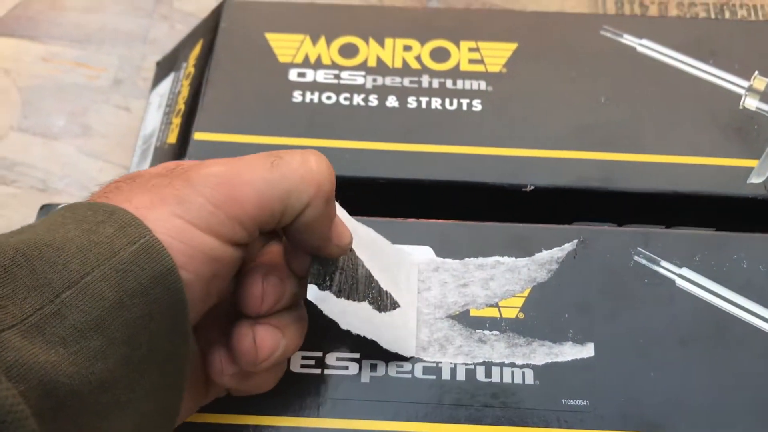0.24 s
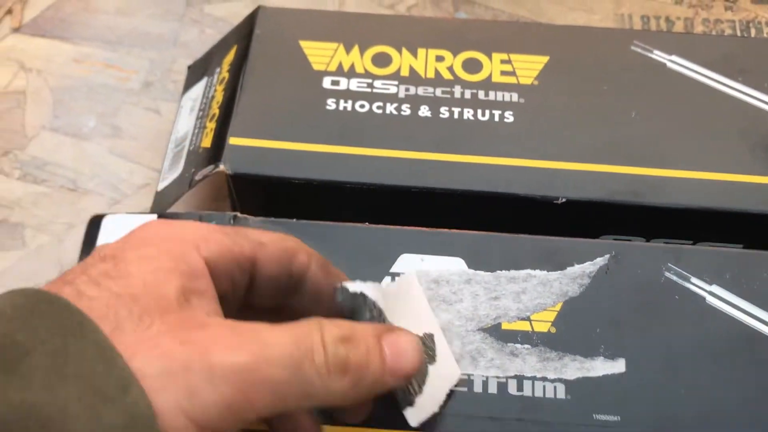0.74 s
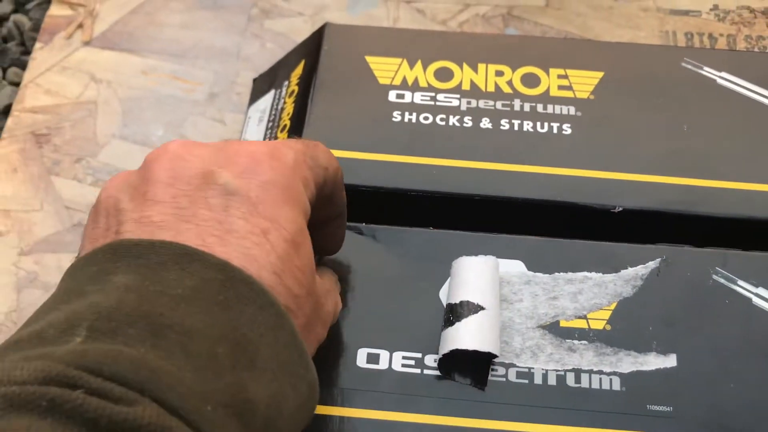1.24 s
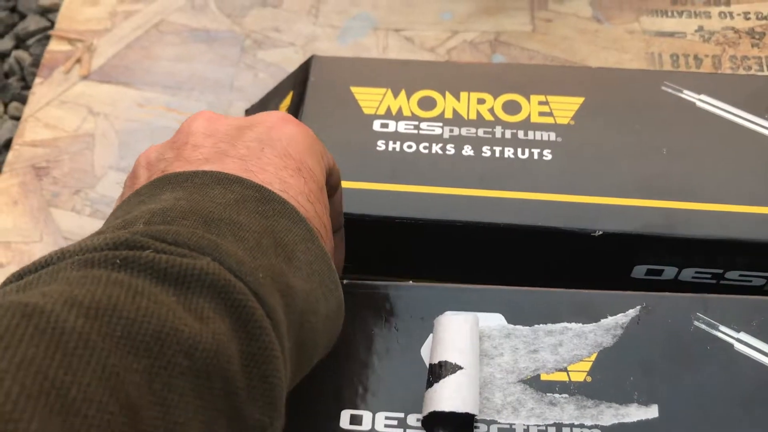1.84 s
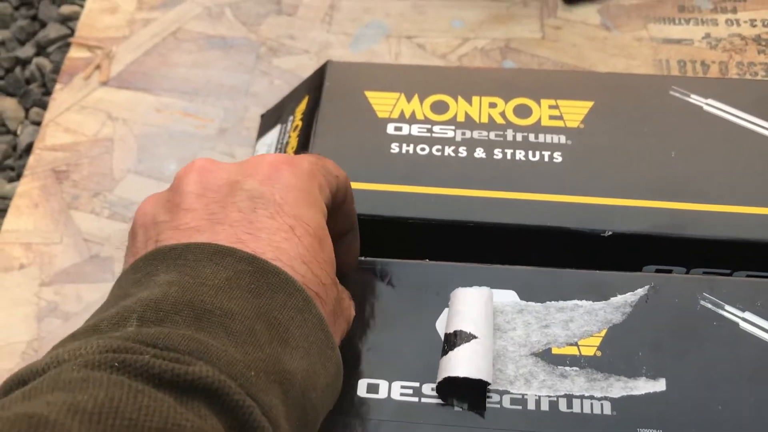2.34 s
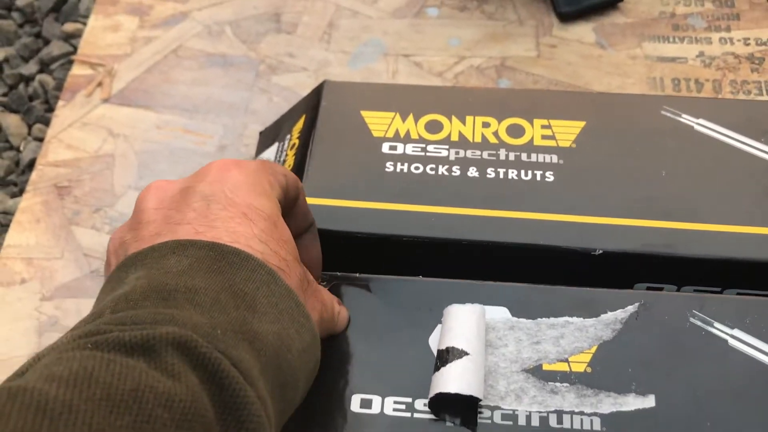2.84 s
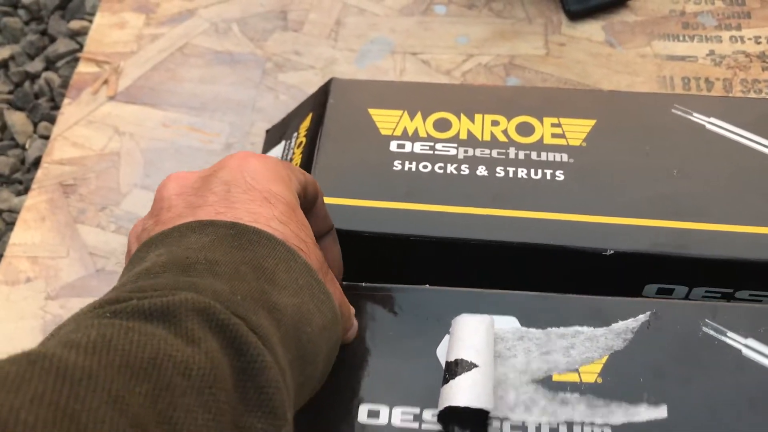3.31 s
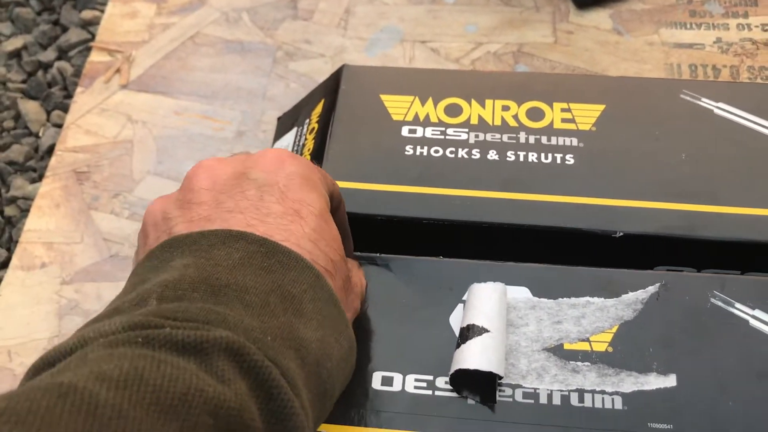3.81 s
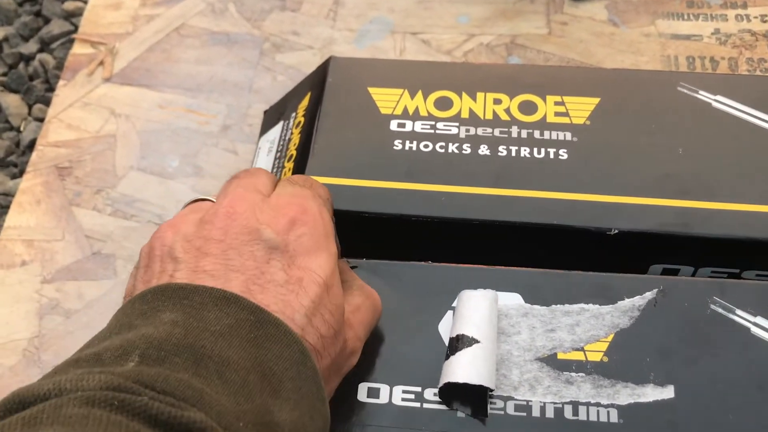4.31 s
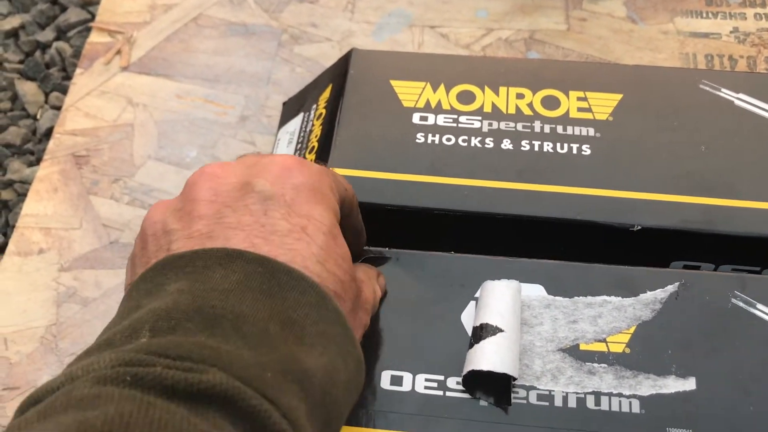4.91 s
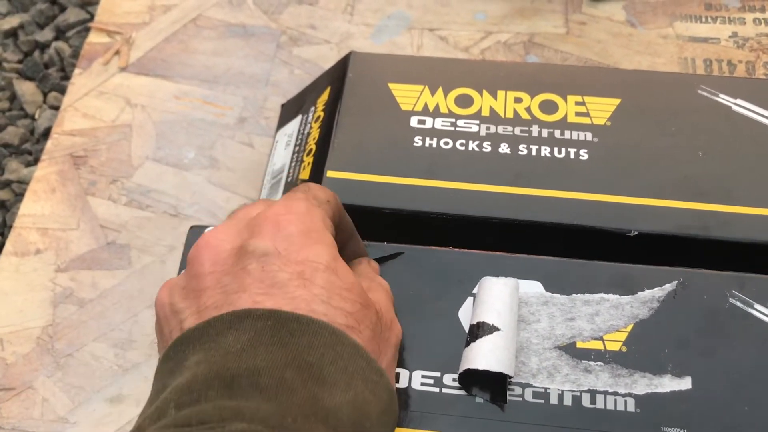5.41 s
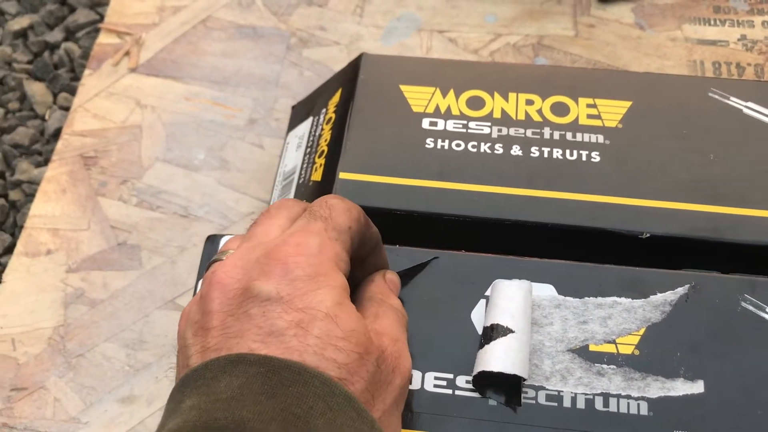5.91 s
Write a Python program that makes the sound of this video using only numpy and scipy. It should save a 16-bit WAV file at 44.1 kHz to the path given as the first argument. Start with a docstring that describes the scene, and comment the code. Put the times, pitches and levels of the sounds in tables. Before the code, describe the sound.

Recorded very close and dry, over faint bassy air and a wavering distant engine drone. From 0 to 0.35 s a paper sticker tears with a crisp, fibrous, swelling rip; another pull follows at 0.38-0.55 s. At 0.64-0.72 s it sticks and slips in a brief low buzzing judder, then sharp clicks and short rips around 0.74-0.98 s, with a soft hollow bump at 0.77. From 1.1 s fingers rub the card quietly, in uneven scrapes with tiny ticks and faint squeaks. The flap pops loudly at 1.89, 2.65 and 3.33 s, each a hard crack with a short boxy boom; the first is brightest. A double tick lands at 2.44. Light rubbing and ticks continue, with very faint tape hiss at 4.05-4.55 and 5.1-5.95 s, a knock at 4.95, two bright snaps at 5.76 and 5.80, then soft rubbing until the end.

```python
"""A hand tears a paper sticker off a long cardboard box, then picks and rubs at the taped flap at its end.
Tearing and rubbing are showers of tiny breaks and slips, filtered by the cardboard; squeaks are sine glides.
The flap pops three times with cracks and decaying box modes; tape peels as shaped noise, with two sharp snaps.
Nails tick on the card as short ringing bursts, the hand bumps the box, and an engine drones far away."""
import sys
import numpy as np
from scipy import signal
from scipy.fft import rfft, irfft, next_fast_len
from scipy.io import wavfile
from scipy.ndimage import uniform_filter1d

SR = 44100
rng = np.random.default_rng(int(sys.argv[2]) if len(sys.argv) > 2 else 0)


def master_out(mix):
    """Clip the mix to full scale and print it as 16-bit PCM to the path in sys.argv[1]."""
    frames = np.transpose(np.atleast_2d(mix))
    ceiling = np.clip(frames, -1, 1)
    pcm = np.round(ceiling * 32767).astype(np.int16)
    wavfile.write(sys.argv[1], SR, pcm)


N = 271215
TIME = np.arange(N) / SR

# Levels in all tables are relative.
# Pulls on the sticker. Each row: start in seconds, length in seconds, panel level in dB, fibre level in dB.
PULLS = [(0.0, 0.35, -41.5, -41.5), (0.106, 0.0037, -44, -42.5), (.202, 0.0042, -45, -47),
         (0.376, 0.11, -38.5, -39), (0.495, 0.054, -50.5, -50), (0.559, 0.011, -43.5, -44),
         (0.57, 0.018, -46.5, -47.5), (0.649, 0.072, -52.5, -63), (0.734, .006, -44.5, -40),
         (0.74, 0.019, -39.5, -49), (0.765, 0.0063, -36.5, -32), (0.782, 0.0079, -44, -46),
         (.838, .025, -60, -63), (0.86, 0.01, -51.5, -47.5), (.926, 0.011, -44, -47),
         (0.938, 0.029, -45.5, -72)]
# Spectrum of tearing fibres. Each row: frequency in Hz, density in dB per Hz.
FIBRES = [(900, -8), (1500, -14), (2150, -7.5), (2650, -4), (3500, -4.5), (4800, -6), (5670, 0.5),
          (6600, -3.5), (7500, -6), (9700, -5.5), (10400, -7), (11300, 0), (16000, -8.5)]
PULL_ATTACK_S, PULL_SWELL_DB, PULL_RELEASE_DB_PER_S = 0.0013, 8, 500
TUG_LOW_HZ = 430  # light tugs hardly move the panel below this


def sticker():
    """Paper fibres break by the thousand, whole bundles more rarely; their tugs shake the panel beneath."""
    tug, rip = 0, 0
    for start_s, length_s, panel_db, fibre_db in PULLS:
        gain = pull(start_s, length_s, PULL_ATTACK_S, PULL_SWELL_DB, PULL_RELEASE_DB_PER_S)
        tug = np.maximum(tug, from_db(panel_db) * gain)
        rip = np.maximum(rip, from_db(fibre_db) * gain)
    bundles = grains(per_s=280, spread_db=2.0, clump_db=2.4, clump_rate_hz=54)
    fibres = grains(per_s=7600, spread_db=2.5, clump_db=-0.5, clump_rate_hz=210)
    breaks = rms_one(fibres) + from_db(-8.5) * rms_one(bundles)
    high_pass = signal.butter(1, TUG_LOW_HZ, "high", fs=SR, output="sos")
    body = from_db(1.5) * tug * rms_one(panel(signal.sosfilt(high_pass, breaks)))
    tearing = shifting(colour(breaks, FIBRES), depth_db=2.5, rate_hz=69)
    return body + from_db(-4.5) * rip * tearing


# Sticker judders. Each row: start in seconds, length in seconds, slips per second, tone level in dB,
# fibre level in dB.
JUDDERS = [(0.641, 0.01, 720, -36, -63), (0.656, 0.009, 610, -32.5, -50.5),
           (0.667, 0.0077, 740, -33.5, -55), (0.671, 0.02, 600, -27, -56), (0.71, 0.0083, 540, -56, -50.5)]


def judder():
    """Stick and slip sing for a few uneven cycles; each slip rips some fibres."""
    out, wobble, shake = np.zeros(N), drift(150), drift(310)
    fibres = colour(rng.standard_normal(N), FIBRES)
    for start_s, length_s, slips_hz, tone_db, fibre_db in JUDDERS:
        on = (TIME >= start_s) & (TIME < start_s + length_s)
        t = TIME[on] - start_s
        hz = slips_hz * (1 + 0.036 * wobble[on])
        slip = np.sin(2 * np.pi * np.cumsum(hz) / SR)
        tone = from_db(tone_db + 2.2 * shake[on]) * slip
        ripping = from_db(fibre_db) * (1 + slip) * fibres[on]
        envelope = np.sqrt(np.abs(np.sin(np.pi * t / length_s)))
        out[on] += envelope * (tone + ripping)
    return out


# Finger strokes over the flap. Each row: middle in seconds, length in seconds, panel level in dB, grit level in dB.
RUBS = [(1.146, 0.07, -56, -60), (1.191, 0.057, -61.5, -58), (1.244, 0.031, -55, -60),
        (1.319, 0.054, -56, -67), (1.367, 0.042, -57.5, -56), (1.532, .08, -51.5, -58.5),
        (1.576, 0.022, -52, -44.5), (1.638, 0.074, -53, -78), (1.75, 0.18, -60.5, -74),
        (1.877, 0.092, -58.5, -54.5), (1.947, 0.018, -76, -51), (2.024, 0.052, -52, -64),
        (2.118, 0.1, -57.5, -60), (2.265, 0.023, -61.5, -72), (2.363, 0.04, -55, -62),
        (2.445, 0.034, -49.5, -50), (2.513, 0.094, -56.5, -55), (2.65, 0.091, -57, -60),
        (2.706, 0.013, -67, -45.5), (2.768, 0.065, -46.5, -61), (2.845, 0.12, -57, -57.5),
        (2.957, .02, -59, -54), (3.0, 0.047, -56.5, -54), (3.153, 0.12, -58, -72), (3.295, 0.052, -67, -45),
        (3.47, 0.068, -55.5, -54.5), (3.547, .07, -57, -65), (3.654, 0.058, -55.5, -58),
        (3.732, 0.046, -62.5, -58.5), (3.823, 0.032, -71, -56), (3.955, 0.17, -64.5, -73),
        (4.108, .06, -66.5, -62), (4.213, 0.081, -55, -65), (4.378, 0.057, -63, -56),
        (4.705, 0.07, -58, -75), (4.772, .045, -52.5, -61), (4.943, 0.087, -52, -59),
        (5.088, 0.085, -55.5, -73), (5.208, 0.13, -55, -53), (5.733, 0.072, -74, -49.5),
        (5.85, 0.094, -52.5, -52), (6.07, 0.066, -54.5, -58), (6.152, 0.15, -49, -72)]
# Spectrum of the grit. Each row: frequency in Hz, density in dB per Hz.
GRIT = [(1100, 2), (1750, -4.5), (2200, -11.5), (2650, -1.5), (3050, -2), (3600, 5.5), (4900, -17.5),
        (5800, -5), (7500, -21.5), (9300, -12.5), (10400, -15), (12000, -6.5), (16000, -10.5)]
RESTING_DB = (-68, -74)  # panel, grit: the hand rests lightly between strokes


def fingers():
    """Skin and nails drag over the card in small uneven slips, now and then catching on an edge."""
    drag, grit = from_db(RESTING_DB)
    for middle_s, length_s, panel_db, grit_db in RUBS:
        gain = arch(middle_s, length_s)
        drag = np.maximum(drag, from_db(panel_db) * gain)
        grit = np.maximum(grit, from_db(grit_db) * gain)
    catches = grains(per_s=77, spread_db=1.5, clump_db=3.0, clump_rate_hz=2.9)
    small_slips = grains(per_s=6000, spread_db=0.0, clump_db=4.0, clump_rate_hz=40)
    slips = rms_one(small_slips) + from_db(-7) * rms_one(catches)
    body = from_db(-0.27) * drag * rms_one(panel(slips))
    scraping = shifting(colour(slips, GRIT), depth_db=5.0, rate_hz=9.8)
    return body + from_db(-5.5) * grit * scraping


# Faint squeaks. Each row: start in seconds, length in seconds, start pitch in Hz, end pitch in Hz, # level in
# dB.
SQUEAKS = [(1.944, 0.016, 8000, 5500, -61), (2.788, 0.032, 9500, 13500, -66), (2.98, 0.02, 4800, 3400, -59),
           (3.27, 0.025, 5150, 4000, -59), (3.549, 0.018, 6300, 3500, -58), (3.735, 0.028, 3270, 8340, -63),
           (4.726, 0.023, 7700, 11900, -66)]


def squeaks():
    """Thin, unsteady tones glide briefly in pitch."""
    out, wobble = np.zeros(N), drift(360)
    for start_s, length_s, start_hz, end_hz, db in SQUEAKS:
        on = (TIME >= start_s) & (TIME < start_s + length_s)
        along = (TIME[on] - start_s) / length_s
        hz = (start_hz + (end_hz - start_hz) * along) * (1 + 0.087 * wobble[on])
        out[on] += from_db(db) * np.sin(np.pi * along) * np.sin(2 * np.pi * np.cumsum(hz) / SR)
    return out


# The flap pops. Each row: time in seconds, ring pitch in Hz, then levels in dB of panel, crack, snap, edge,
# and the box's first, second, third and higher air modes.
POPS = [(1.893, 4070, -19, -28, -26, -39, -41.5, -30.5, -30.5, -28.5),
        (2.6469, 2740, -23.5, -34.5, -38, -32.5, -39.5, -29, -33, -33.5),
        (3.332, 2740, -23, -30, -37, -25.5, -39, -34, -26.5, -29)]
# Modes of the end flap. Each row: frequency in Hz, width in Hz, level in dB.
FLAP = [(765, 51, 6), (1040, 78, 1.5), (1303, 150, -5.5)]


def flap():
    """The flap gives way with a crack, rings briefly and pumps the air in the box."""
    out = np.zeros(N)
    clack = peak_one(resonate(signal.unit_impulse(SR // 10), FLAP), size=176)
    for s, ring_hz, panel_db, *levels_db in POPS:
        bands_db, modes_db = [panel_db - 4.0] + levels_db[:3], levels_db[3:]
        release = crack(bands_db, ring_hz, ragged_db=-1.5, ring_db=9.0, ring_t60_s=0.02)
        add(out, s + 0.000937, from_db(-1.84) * release)
        add(out, s + .003, from_db(panel_db - 3.5) * clack)
        add(out, s, from_db(6.5) * boom(modes_db, scatter_db=3.5))
    return out


# Peeling tape. Each row: start in seconds, length in seconds, hiss level in dB.
PEELS = [(4.047, 0.054, -67.5), (4.124, 0.44, -65.5), (5.12, 0.063, -66), (5.235, .22, -67),
         (5.462, 0.49, -62.5)]
# Spectrum of the glue threads. Each row: frequency in Hz, density in dB per Hz.
TAPE = [(1100, -3), (1700, -2.5), (2500, -5), (3400, -1.5), (4400, -1), (5200, -5), (6100, -3),
        (7700, -5.5), (9300, -3), (10500, -9), (11800, -2.5), (14000, 0), (16000, -6)]
# Modes of the taut tape. Each row: frequency in Hz, width in Hz, level in dB.
TAUT = [(1600, 310, 5.5), (3400, 160, 2.5), (4350, 320, -3.5), (5600, 220, -9)]
PEEL_ATTACK_S, PEEL_SWELL_DB, PEEL_RELEASE_DB_PER_S = 0.01, 7.5, 138


def tape():
    """Glue threads part so densely that they merge into a fine, bright hiss, coloured by the taut tape."""
    gain = 0
    for start_s, length_s, db in PEELS:
        gain = gain + from_db(db) * pull(start_s, length_s, PEEL_ATTACK_S, PEEL_SWELL_DB, PEEL_RELEASE_DB_PER_S)
    threads = colour(rng.standard_normal(N) * from_db(2.4 * drift(170)), TAPE)
    return from_db(5.5) * gain * rms_one(threads + resonate(threads, TAUT))


# The tape snaps free. Each row: time in seconds, ring pitch in Hz, panel knock in dB, snap level in dB.
SNAPS = [(5.757, 6560, -43, -27.5), (5.8, 1680, -35, -24.5)]
SNAP_UNDER_DB, SNAP_OVER_DB = -5.5, -10  # bands under and over the snap band


def snaps():
    """The tape lets go at once: a crack with a strong ring."""
    out = np.zeros(N)
    for s, ring_hz, knock_db, db in SNAPS:
        bands_db = [knock_db, db + SNAP_UNDER_DB, db, db + SNAP_OVER_DB]
        snap = crack(bands_db, ring_hz, ragged_db=-2.0, ring_db=14.0, ring_t60_s=0.018)
        add(out, s + 0.00059, from_db(-4.5) * snap)
    return out


# Ticks of nail and paper. Each row: time in seconds, ring pitch in Hz, panel knock in dB, crack level in dB,
# treble tilt in dB per band.
TICKS = [(.1145, 1550, -40, -39.5, -1), (.2035, 5970, -38.5, -45.5, 2), (0.397, 3500, -51, -50, 0),
         (.567, 1780, -40.5, -58, 7.5), (.641, 2230, -29.5, -37, 0.5), (.723, 1750, -64, -40, -2.5),
         (.742, 1640, -42, -35, -2), (.773, 2660, -26.5, -32, -9), (.782, 2770, -48, -32.5, 3),
         (.837, 2400, -48, -47, -16), (.842, 2220, -38, -58, -8), (.879, 6040, -55, -55, 8),
         (.9065, 3080, -37.5, -38.5, -3), (.932, 1680, -58, -45, -4), (.983, 3300, -43, -45.5, -1),
         (1.573, 5060, -56, -39, -2), (2.001, 1680, -46, -68, -5), (2.054, 1630, -48, -54, -4),
         (2.431, 1870, -32.5, -42.5, -10), (2.445, 1790, -31.5, -32, -26), (2.951, 2660, -51, -51.5, 3),
         (3.159, 2740, -47.5, -48, -11), (3.538, 1460, -38.5, -59, -11), (3.662, 1510, -40.5, -60.5, 3),
         (4.315, 1530, -46, -55, -9), (4.564, 1900, -48, -42, -0.5), (4.7475, 1460, -44, -54, -5),
         (4.776, 4050, -42, -52, 2), (4.822, 1870, -75, -57.5, -2), (4.955, 1470, -32.5, -44, -3),
         (4.96, 1810, -43, -54, -2), (4.985, 3060, -55, -50.5, -5), (5.084, 1700, -50, -61, -4),
         (5.675, 1680, -46.5, -56, -13), (6.047, 3400, -43, -55, -7)]
LEAD_IN_DB = -19.5


def ticks():
    """Nail and paper scratch up to a small release on the surface, which then rings."""
    out = np.zeros(N)
    for s, ring_hz, knock_db, crack_db, tilt_db in TICKS:
        bands_db = [knock_db, *(crack_db + tilt_db * np.arange(3))]
        scratch = from_db(LEAD_IN_DB) * lead_in(bands_db, rise_s=0.0041)
        tick = crack(bands_db, ring_hz, ragged_db=-0.7, ring_db=8.5, ring_t60_s=0.027)
        whole = np.concatenate([scratch, from_db(-3.0) * tick])
        add(out, s + .0007 - len(scratch) / SR, whole)
    return out


# Soft bumps of the hand. Each row: time in seconds, level in dB, tilt in dB per air mode.
BUMPS = [(.643, -49, 1), (0.774, -32, -4.5), (0.789, -49.5, 2), (.844, -52, 1), (.907, -61.5, 4),
         (.948, -42.5, -1), (1.526, -54, 0.5), (2.354, -54.5, -1.5), (2.442, -52, 3), (3.197, -46, -3),
         (3.604, -53.5, 0.5), (3.664, -50, .5), (4.951, -53, 2), (5.802, -64.5, 4), (5.885, -55.5, -1.5),
         (6.049, -57, 1)]
BUMP_DEEPEST_DB = -4.5  # a soft bump hardly reaches the deepest mode


def bumps():
    """The hand softly bumps the box and sets its air booming."""
    out, mode = np.zeros(N), np.arange(len(BOX_AIR))
    for s, db, tilt_db in BUMPS:
        modes_db = db + tilt_db * mode + BUMP_DEEPEST_DB * (mode == 0)
        add(out, s, from_db(3.5) * boom(modes_db, scatter_db=4.0))
    return out


# Bands in which a tick rings. Each row: low edge in Hz, high edge in Hz, t60 in seconds, tail level in dB, gain in dB.
TICK_BANDS = [(512, 1700, 0.092, -26, 0.5), (1280, 4130, 0.049, -14.5, -3), (3500, 5930, 0.076, -58, -5),
              (7440, 13400, 0.047, -24.5, -5)]
# Partials of a ringing flake of card. Each row: multiple of its pitch, level in dB.
FLAKE = [(1, 7), (.81, -9), (1.13, -7), (1.74, -27)]


def crack(levels_db, ring_hz, ragged_db, ring_db, ring_t60_s, size=5000):
    """One release: a few milliseconds of breaking, a tail in each band, and a ringing flake of card."""
    t, out = np.arange(size) / SR, 0
    for k, ((low_hz, high_hz, t60_s, tail_db, gain_db), db) in enumerate(zip(TICK_BANDS, levels_db)):
        tail = from_db(tail_db + ragged_db - 60 * t / t60_s)
        breaking = from_db(-12.5 - 60 * t / 0.0063)
        push = (t == 0) + (tail + breaking) * rng.standard_normal(size)
        if k == 0:
            push = panel(push)  # the lowest band is radiated by the panel
        band_pass = signal.butter(3, [low_hz, min(high_hz, .45 * SR)], "band", fs=SR, output="sos")
        band = signal.sosfilt(band_pass, push)
        out = out + from_db(db + gain_db) * peak_one(band, size=176)
    flake_db = np.interp(ring_hz, band_centres(), levels_db) + ring_db
    partials = sum(from_db(db - 10.5) * np.sin(2 * np.pi * ratio * ring_hz * t) for ratio, db in FLAKE)
    return out + from_db(flake_db - 60 * t / ring_t60_s) * partials


def band_centres():
    """Geometric centres of the tick bands in Hz."""
    return [np.sqrt(low_hz * high_hz) for low_hz, high_hz, *rest in TICK_BANDS]


def lead_in(levels_db, rise_s, size=900):
    """A brief scratch that swells up to the moment of release."""
    per_hz = []
    for db, (low_hz, high_hz, *rest) in zip(levels_db, TICK_BANDS):
        per_hz.append(from_db(db) * np.sqrt(SR / 2 / (high_hz - low_hz)))
    shape = np.interp(np.fft.rfftfreq(size, 1 / SR), band_centres(), per_hz, left=0)
    noise = irfft(rfft(rng.standard_normal(size)) * shape, size)
    return noise * np.exp((np.arange(size) - size) / SR / rise_s)


# Air modes of the long box. Each row: frequency in Hz, level in dB, t60 in seconds.
BOX_AIR = [(116.2, 0.5, 0.23), (176, 1, 0.15), (242, 3, 0.12), (308.6, -3, 0.11), (383, -6, 0.11),
           (469, -9.5, 0.048)]


def boom(modes_db, scatter_db, size=12000):
    """Standing waves in the box air, alternating in sign, as for a pulse that runs to and fro inside."""
    t, out = np.arange(size) / SR, 0
    for k, (hz, db, t60_s) in enumerate(BOX_AIR):
        level_db = db + modes_db[min(k, len(modes_db) - 1)] + scatter_db * rng.standard_normal()
        out = out + (-1) ** k * from_db(level_db - 60 * t / t60_s) * np.sin(2 * np.pi * hz * t)
    return out


# Cardboard panel modes. Each row: frequency in Hz, width in Hz, level in dB.
PANEL = [(182, 93, 3.5), (256, 99, -6.5), (345, 79, 6), (620, 68, 6.5), (681, 107, 4.5), (814, 71, 2.5),
         (906, 29, 3), (1016, 160, -15), (1460, 200, -12), (1730, 98, -59)]


def panel(x):
    """The broad cardboard face radiates what shakes it."""
    return resonate(x, PANEL)


# Close reflections off box lid and board. Each row: delay in seconds, level in dB.
REFLECTIONS = [(.000617, -23), (.00214, -30.5), (.0047, -23.5)]


def reflected(x):
    """Nearby flat surfaces add short echoes that ripple the spectrum."""
    return x + sum(from_db(db) * np.interp(TIME - delay_s, TIME, x, left=0) for delay_s, db in REFLECTIONS)


# Level of the distant drone. Each row: time in seconds, level in dB.
DRONE = [(0.0, -55.5), (0.2, -69), (0.45, -54), (0.56, -64), (0.8, -52), (0.89, -57.5), (2.71, -55.5),
         (2.74, -51.5), (3.24, -55), (3.37, -48.5), (3.58, -58), (3.72, -48), (3.9, -67), (4.08, -53),
         (5.58, -52), (5.7, -74), (5.89, -51), (6.15, -54.5)]
DRONE_HZ = 76.2


def drone():
    """A far engine's faint tone wavers in pitch and level."""
    phase = 2 * np.pi * np.cumsum(DRONE_HZ + 1.36 * drift(4.4)) / SR
    level_db = np.interp(TIME, *np.transpose(DRONE)) + 3.9 * drift(15)
    return from_db(level_db + 3.0) * np.sin(phase)


# Spectrum of the quiet air. Each row: frequency in Hz, density in dB per Hz.
AMBIENT = [(20, -23), (40, 7.5), (90, 4.5), (140, 1.5), (240, 4.5), (400, -7.5), (500, -12.5), (800, -14.5),
           (1500, -20.5), (3000, -33), (7000, -35.5), (16000, -35.5)]
AMBIENT_DB = -60.5


def quiet_air():
    """Steady coloured noise, strongest in the bass."""
    return from_db(AMBIENT_DB) * colour(rng.standard_normal(N), AMBIENT)


def pull(start_s, length_s, attack_s, swell_db, release_db_per_s):
    """Gain of one pull: a quick grip, a steady swell to full level as tension builds, a release."""
    t = TIME - start_s
    db = swell_db * np.minimum(t / length_s - 1, 0) - release_db_per_s * np.maximum(t - length_s, 0)
    return np.clip(t / attack_s, 0, 1) * from_db(np.maximum(db, -200))


RUB_ARCH_DB = 6  # drop at the ends of a stroke


def arch(middle_s, length_s):
    """Gain of one finger stroke, which swells and fades."""
    drop_db = RUB_ARCH_DB * (2 * (TIME - middle_s) / length_s) ** 2
    return from_db(-np.minimum(drop_db, 200))


def grains(per_s, spread_db, clump_db, clump_rate_hz):
    """Tiny slips and breaks of uneven size, arriving at random, their level swelling in clumps."""
    sizes = from_db(spread_db * np.minimum(rng.exponential(1, N), 5)) * rng.choice([-1, 1], N)
    hits = rng.random(N) < per_s / SR
    return sizes * hits * from_db(clump_db * drift(clump_rate_hz)) + 1e-18


def shifting(x, depth_db, rate_hz, count=10):
    """The sheet bends and the contact moves, so each part of the spectrum swells and fades on its own; rms 1."""
    size = next_fast_len(N, real=True)
    spectrum = rfft(x, size)
    log_hz = np.log(np.fft.rfftfreq(size, 1 / SR) + 1)
    place = np.interp(log_hz, np.log([1200, 15000]), [0, count - 1])
    out = 0
    for k in range(count):
        band = irfft(spectrum * np.maximum(1 - np.abs(place - k), 0), size)[:N]
        out = out + band * from_db(depth_db * drift(rate_hz))
    return rms_one(out)


def resonate(x, modes):
    """Resonances in parallel, each a two-pole filter."""
    out = 0
    for hz, width_hz, db in modes:
        r = np.exp(-np.pi * width_hz / SR)
        poles = [1, -2 * r * np.cos(2 * np.pi * hz / SR), r * r]
        out = out + from_db(db) * (1 - r * r) / 2 * signal.lfilter([1, 0, -1], poles, x + 1e-18)
    return out


def colour(x, spectrum):
    """Causal minimum-phase filter with the given spectrum; rms 1."""
    hz, db = np.transpose(spectrum)
    size = next_fast_len(N + SR // 10, real=True)
    freqs = np.maximum(np.fft.rfftfreq(size, 1 / SR), 1)
    cepstrum = irfft(np.log(from_db(np.interp(np.log(freqs), np.log(hz), db))), size)
    response = np.exp(rfft(2 * cepstrum[:size // 2], size))
    return rms_one(irfft(rfft(x, size) * response, size)[:N])


def drift(rate_hz):
    """Slow chance with spread 1: low-passed noise, computed every 40 samples."""
    r = np.exp(-80 * np.pi * rate_hz / SR)
    noise = rng.standard_normal(N // 40 + 2002)
    slow = signal.lfilter([1], [1, -2 * r, r * r], noise)[2000:]  # drop the settling
    return np.interp(np.arange(N) / 40, np.arange(len(slow)), rms_one(slow))


def from_db(db):
    """Decibels to gain."""
    return 10 ** (np.asarray(db) / 20)


def rms_one(x):
    """Scale to unit power."""
    return x / np.sqrt(np.mean(x ** 2) + 1e-20)


def peak_one(x, size):
    """Scale so that the loudest stretch of this many samples has unit power."""
    return x / np.sqrt(uniform_filter1d(x ** 2, size, mode="constant").max() + 1e-20)


def add(out, s, x):
    """Mix a sound in at a time in seconds."""
    at = max(round(s * SR), 0)
    out[at:at + len(x)] += x[:max(N - at, 0)]


# Narrow modes of the stiff top sheet. Each row: frequency in Hz, width in Hz, level in dB.
SHEET = [(2463, 54, 1.5), (3540, 52, -21), (4190, 110, -6.5), (5520, 26, -5), (5600, 22, -11),
         (7060, 24, 3), (9400, 130, -1), (11000, 24, -46), (12100, 46, -17)]


def scene():
    """Everything but the background is close; rubs and ticks alike set the top sheet ringing."""
    friction = from_db(-0.78) * reflected(sticker() + fingers() + tape() + squeaks())
    impacts = from_db(-1.13) * (judder() + flap() + ticks() + snaps() + bumps())
    contact = friction + impacts
    return (contact + from_db(-2.5) * resonate(contact, SHEET) + drone() + quiet_air())[None]


CUTOFF_HZ = 16200


def record(dry):
    """The microphone drops the deepest bass, and the top is cut."""
    thin = signal.sosfilt(signal.butter(2, 38, "high", fs=SR, output="sos"), dry)
    return signal.sosfilt(signal.ellip(10, .1, 80, CUTOFF_HZ, fs=SR, output="sos"), thin)


dry = scene()
out = record(dry)
master_out(out)
```